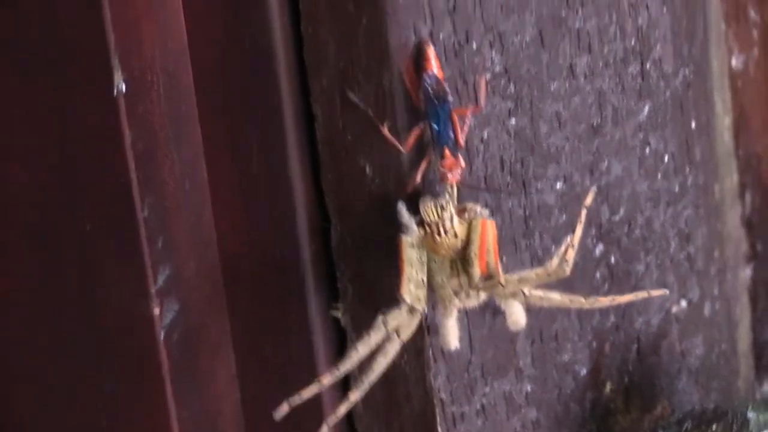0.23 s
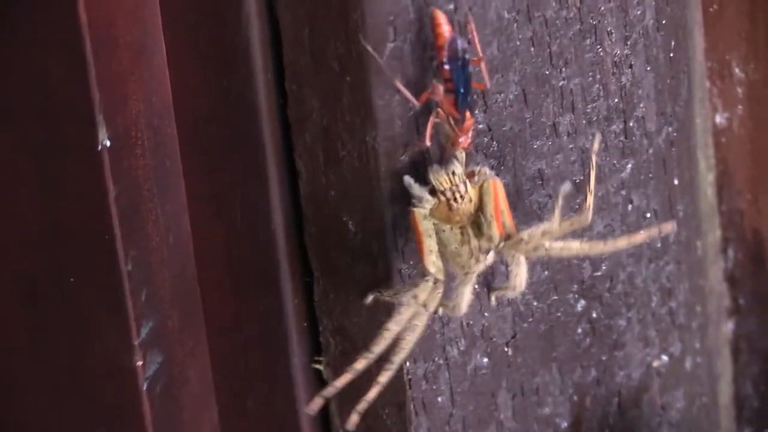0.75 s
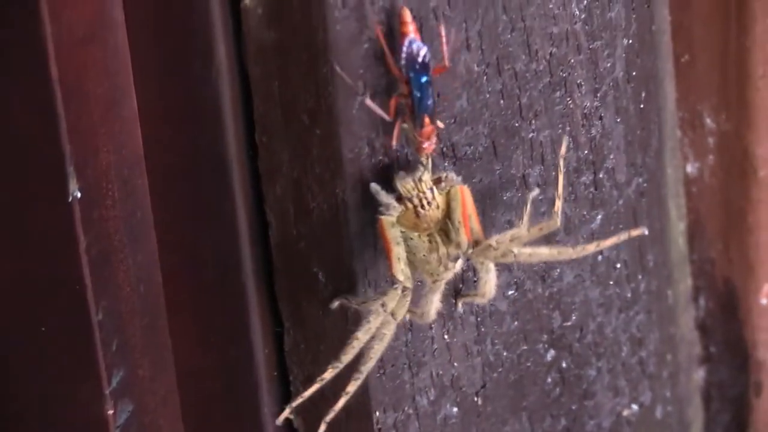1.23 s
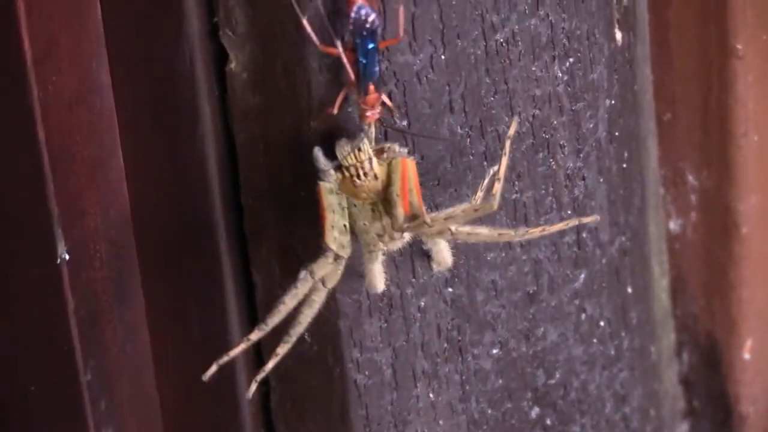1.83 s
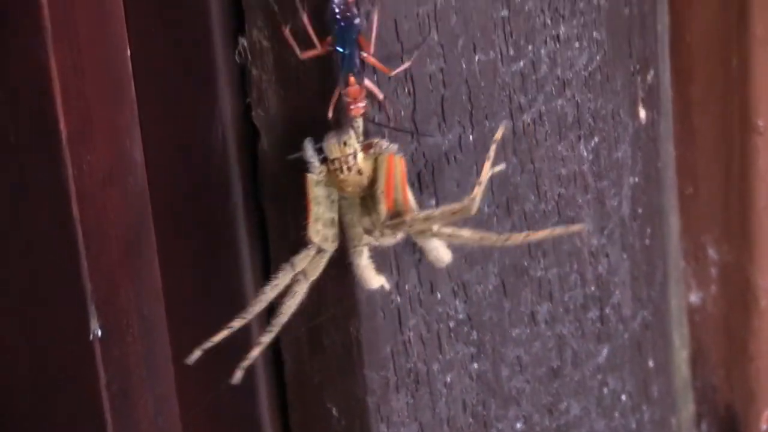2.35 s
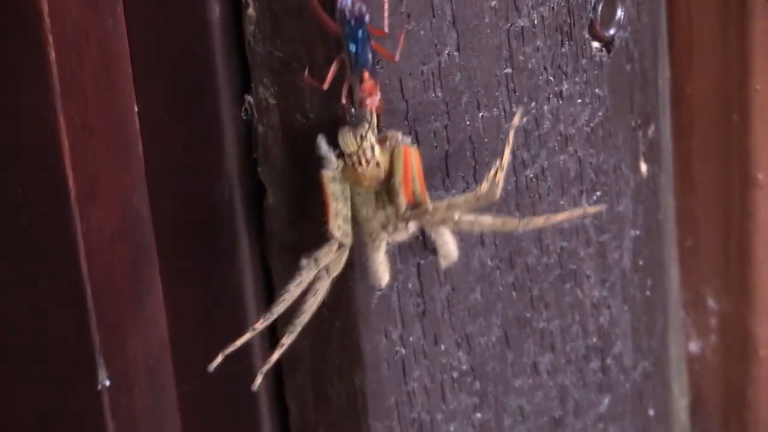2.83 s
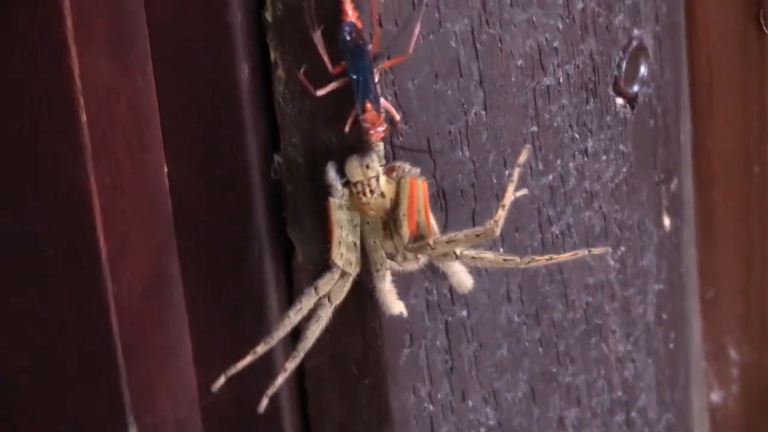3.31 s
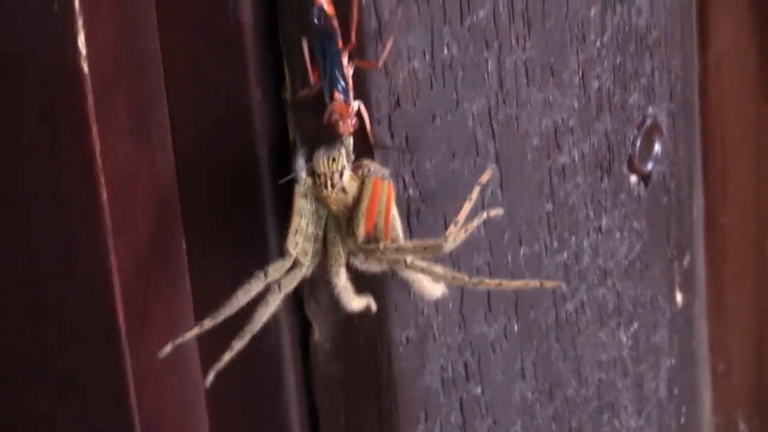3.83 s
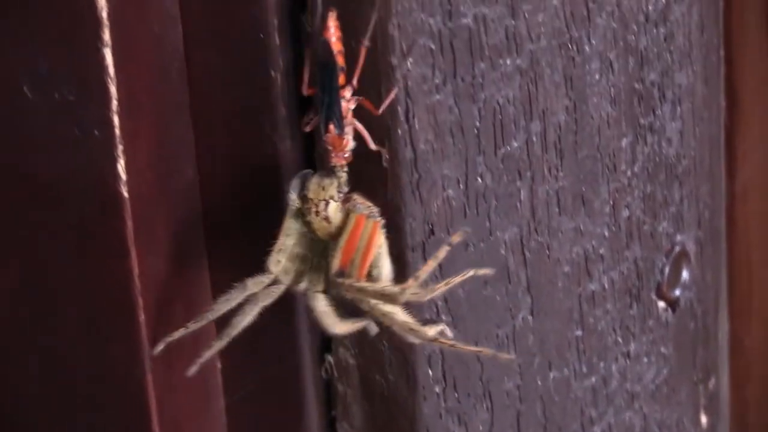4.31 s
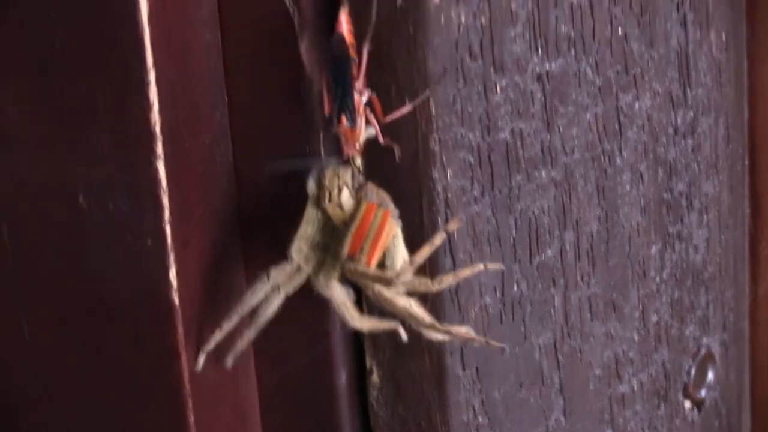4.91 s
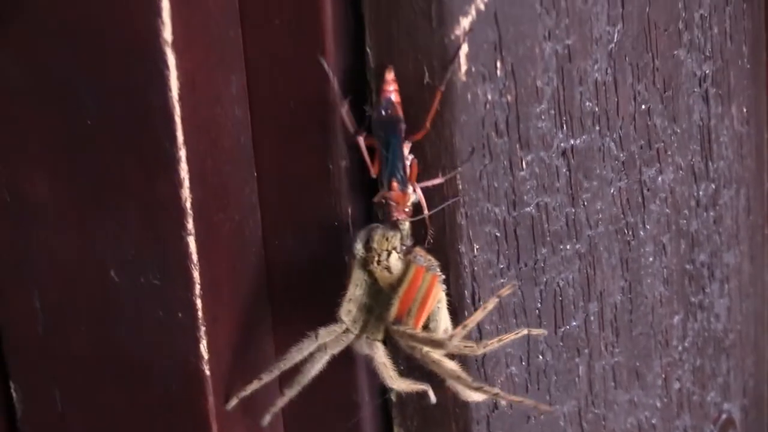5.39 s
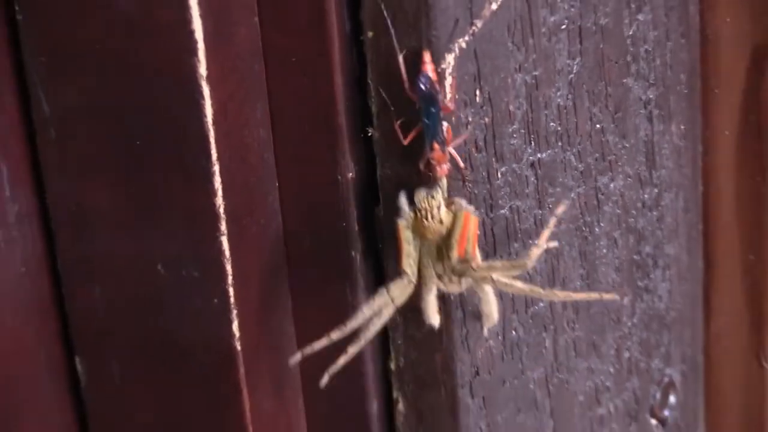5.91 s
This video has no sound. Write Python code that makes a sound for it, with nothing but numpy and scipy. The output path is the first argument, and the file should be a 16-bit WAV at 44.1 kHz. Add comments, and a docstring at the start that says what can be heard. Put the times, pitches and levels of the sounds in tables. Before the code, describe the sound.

A distant engine and a faint electrical hum lie beneath a shrill, steady insect chorus, with crickets slightly to the right. Birds call among echoing trees: grainy rasps, rough falling growls ending in clear chips, thin peeps and far whistles. After a sparser middle, rasps return in quick succession, then one dry tap clicks close by amid yips and chips, and wheezy rasps close the scene.

```python
"""From the outset an insect chorus holds a steady shrill band, filtered noise, while crickets chirp in swelling tones;
soon far insects trill thinly, each on one pitch. A distant engine throbs as harmonics of its firing rate, first
slowing and then picking up, over a faint steady hum. Birds call in a forest: shaped noise gives hissing rasps and
gliding tones give far, nearly level whistles; soon come roughened growls that fall and end in bright chips, then
peeps, squawks, yips and thin wheezes. Late on, one sharp tap sounds close by, as a burst of damped modes."""
import sys
import numpy as np
from scipy import signal
from scipy.io import wavfile
from scipy.ndimage import uniform_filter1d

SR = 44100
rng = np.random.default_rng(int(sys.argv[2]) if len(sys.argv) > 2 else 0)


def store_pcm(level_fs):
    """Save levels as 16-bit WAV."""
    pcm = np.round(np.clip(level_fs, -1, 1) * 32767).astype(np.int16)
    wavfile.write(sys.argv[1], SR, np.atleast_2d(pcm).T)


N = 271435
TIME = np.arange(N) / SR
# Frequencies (Hz) and times (s) of the short-time spectra
BINS = np.fft.rfftfreq(1024, 1 / SR)
FRAMES = np.arange(N // 256 + 5) * 256 / SR


def gain_of(db):
    """Level law: decibels to an amplitude ratio."""
    return 10 ** (np.asarray(db) / 20)


def evened(x):
    """Power normalisation: scales to rms 1."""
    return x / np.sqrt(np.mean(x ** 2) + 1e-20)


def read(points, hz):
    """Spectral envelope: interpolates a table on a log-frequency axis."""
    f, value = np.transpose(points)
    return np.interp(np.log(hz + 1), np.log(f + 1), value)


def follow(rows):
    """Time envelope: interpolates a table at every sample."""
    return np.interp(TIME, *np.transpose(rows))


def add(mix, s, sound):
    """Superposition: mixes a sound in at a time, or at the very start if that time is negative."""
    part = mix[max(round(s * SR), 0):][:len(sound)]
    part += sound[:len(part)]


def wander(rate):
    """Band-limited random modulation: rms 1, fluctuating up to about a rate per second."""
    steps = rng.standard_normal(size=10000)
    return evened(np.interp(np.arange(N) * 2 * rate / SR, np.arange(len(steps)), steps))


# Likeness of the two channels in diffuse noise. Each row: frequency in Hz, left-right correlation.
CHANNEL_LIKENESS = [(30, .6), (70, .99), (170, .99), (330, .5), (700, .2), (2000, .45), (8000, .5),
                    (14000, .7)]


def noise(shape_db, patchy_db):
    """Diffuse field: coloured stereo noise of rms 1, partly correlated, with small drifting patches."""
    a, b, c, d, patches = rng.standard_normal((5, len(FRAMES), len(BINS)))
    patches = uniform_filter1d(uniform_filter1d(patches, size=7, axis=0), size=7, axis=1)
    patches = np.clip(evened(patches), -2, 2)
    same = np.clip(read(CHANNEL_LIKENESS, BINS), -1, 1)
    left = a + 1j * b
    right = same * left + np.sqrt(1 - same ** 2) * (c + 1j * d)
    spectra = np.array([left, right]) * gain_of(shape_db + patchy_db * patches)
    return evened(signal.istft(spectra.transpose(0, 2, 1), nperseg=1024, noverlap=768)[1][:, :N])


# Decay of the forest's echo tail. Each row: frequency in Hz, time to fall 60 dB in seconds.
FOREST_DECAY = [(200, .068), (1300, 1), (5000, 1), (9000, 0.01)]


def forest(x, wet_db, pan_db, near_db):
    """Reverberation: direct sound, early scatter from near trunks and leaves, and a tail from trees behind."""
    hz, t, z = signal.stft(rng.standard_normal((2, SR)), SR, nperseg=256)
    decay = gain_of(-60 * t / read(FOREST_DECAY, hz)[:, None])
    tail = signal.istft(z * decay, SR, nperseg=256)[1][:, :SR]
    early = rng.standard_normal((2, SR)) * np.exp(-TIME[:SR] / 0.022)
    echoes = (gain_of(wet_db) * evened(tail) + gain_of(near_db) * evened(early)) / np.sqrt(SR)
    heard = x + signal.fftconvolve(x[None], echoes, axes=1)[:, :N]
    return heard * gain_of([[pan_db / 2], [-pan_db / 2]])


def bend(length, hz, ratios):
    """Frequency glide: a parabola through pitch ratios at the start, middle and end."""
    curve = np.polyfit([0, .5, 1], ratios, 2)
    return hz * np.polyval(curve, np.linspace(0, 1, round(length * SR)))


def sing(notes, partials, jitter, jitter_rate, flutter, edge):
    """Additive synthesis of (s, pitch curve, dB) notes from (multiple, dB) partials, roughened by FM and AM."""
    out, shake, tremble = np.zeros(N), wander(jitter_rate), wander(jitter_rate)
    for s, pitch, db in notes:
        at = (round(s * SR) + np.arange(len(pitch))) % N
        phase = 2 * np.pi * np.cumsum(pitch * (1 + jitter * shake[at])) / SR
        tone = sum(gain_of(d) * np.sin(k * phase) for k, d in partials)
        tone = evened(tone * (1 + flutter * tremble[at]))
        fades = signal.windows.tukey(len(pitch), np.clip(edge, .05, 1))
        add(out, s, gain_of(db) * tone * fades)
    return out


# Colour of the forest air. Each row: frequency in Hz, relative density in dB per Hz.
AIR_COLOUR = [(50, -52), (85, -24), (130, 11.5), (200, 7.5), (330, -1), (500, 1), (1200, -3), (2000, -7.5),
              (3300, -9.5), (5600, -42), (9000, -18.5), (11500, -27), (15500, -36)]


def air(level_db=-55):
    """Broadband noise: the soft wash of the forest and far low rumble."""
    return noise(read(AIR_COLOUR, BINS), patchy_db=1.5) * gain_of(level_db + .5 * wander(4.0))


# Engine speed, sagging and then picking up. Each row: time in seconds, firings per second.
ENGINE_FIRINGS = [(0, 33.4), (.35, 32.1), (.65, 31.6), (1, 30.4), (1.45, 29.8), (1.8, 29.1), (2.5, 28.2),
                  (3, 28.25), (4.1, 28.8), (4.75, 29.45), (5.3, 30.3), (6.15, 31.35)]
# Gain of the engine's throb. Each row: time in seconds, gain in dB.
ENGINE_GAIN = [(0, -4), (.6, 0.5), (1.5, -5), (2.2, -9), (3.1, -1.5), (3.6, -6.5), (4, -2), (5.3, 1.5),
               (6.15, 1.5)]
# The engine coasts, then pulls again. Each row: time in seconds, load from 0 to 1.
ENGINE_LOAD = [(0, 0.57), (.35, 0.11), (1.4, 0.18), (2.05, 0.35), (2.4, 1), (6.15, 0.85)]
# Exhaust resonances while coasting. Each row: frequency in Hz, level in dB before the engine's gain.
COASTING_PIPE = [(60, -83), (93, -65), (122, -53), (155, -53.5), (185, -60.5), (230, -69), (290, -87),
                 (400, -82)]
# Exhaust resonances while pulling. Each row: frequency in Hz, level in dB before the engine's gain.
PULLING_PIPE = [(58, -81), (118, -86), (143, -60.5), (153, -49.5), (172, -49.5), (187, -49.5), (205, -50),
                (217, -56.5), (228, -87), (243, -92), (254, -73), (272, -63), (303, -56.5), (316, -72.5),
                (400, -75)]
# Colour of the low rumble around the engine. Each row: frequency in Hz, relative density in dB per Hz.
RUMBLE_COLOUR = [(50, -72), (100, -15), (160, 6), (215, 6.5), (260, 3), (420, -8)]
# Loudness of that rumble. Each row: time in seconds, level in dB.
RUMBLE_LEVEL = [(0, -53), (.35, -57), (1, -63), (4.95, -56), (5.2, -47.5), (5.45, -54), (6.15, -51)]
COAST_LIMP = .35  # strong-weak contrast of alternate firings at no load


def engine(ring_hz=175, ring_width_hz=80, uneven=0.075):
    """Source and filter: firing-rate harmonics slide through exhaust resonances, limping less under load."""
    rate, load = follow(ENGINE_FIRINGS), np.clip(follow(ENGINE_LOAD), 0, 1)
    firings = np.cumsum(rate) / SR + .012 * (1 - load) * wander(14)
    body = np.zeros(N)
    for order in range(2, 14):
        hz = order * rate
        db = (1 - load) * read(COASTING_PIPE, hz) + load * read(PULLING_PIPE, hz)
        # phase lag of a resonator, passing zero at its own frequency
        lag = np.arctan((hz / ring_hz - ring_hz / hz) * ring_hz / ring_width_hz)
        level = np.sqrt(2) * gain_of(db + .8 * wander(2))
        body += level * np.cos(2 * np.pi * order * firings - lag)
    sizes = 1 + uneven * wander(15) + COAST_LIMP * (1 - load) * np.cos(np.pi * firings)
    throb = body * sizes * gain_of(follow(ENGINE_GAIN))
    above_rumble = BINS > RUMBLE_COLOUR[-1][0]
    rumble = noise(read(RUMBLE_COLOUR, BINS) - 200 * above_rumble, patchy_db=1)
    return throb + rumble * gain_of(follow(RUMBLE_LEVEL))


# A steady electrical hum. Each row: frequency in Hz, level in dB.
HUM_TONES = [(120, -66.5), (240, -65.5)]


def hum():
    """Stationary sinusoids: two faint steady tones under the engine."""
    return sum(np.sqrt(2) * gain_of(db) * np.sin(2 * np.pi * hz * TIME) for hz, db in HUM_TONES)


# Colour of the insect chorus. Each row: frequency in Hz, relative density in dB per Hz.
CHORUS_COLOUR = [(6500, -21), (6820, -16.5), (7000, -5), (7140, 0.5), (7330, 3.5), (7530, -9.5),
                 (7610, -0.5), (7730, -25), (7830, -2.5), (7930, -4), (8250, -8.5), (8500, -23.5),
                 (9200, -34.5)]


def chorus(level_db=-52.0):
    """Narrow-band noise: many insects fuse into one shrill band that flickers faintly in level."""
    return noise(read(CHORUS_COLOUR, BINS), patchy_db=1.0) * gain_of(level_db + 0.17 * wander(35))


CHIRP_SLIP_S = .003  # rms timing error of a chirp


def beats(start, end, period):
    """Jittered periodicity: evenly spaced chirp times, each slipping a little."""
    times = np.arange(start, end, period)
    return times + CHIRP_SLIP_S * rng.standard_normal(len(times))


def cricket(times, levels, hz, stroke_s, fall_hz, spread_hz):
    """Amplitude modulation: three wing strokes swell one high tone, which sags a little in pitch."""
    out, strokes = np.zeros(N), np.arange(0, 3, 1 / (stroke_s * SR))
    for s, db, (detune, *sizes) in zip(times, levels, rng.standard_normal((len(times), 4))):
        pitch = hz + spread_hz * detune + fall_hz * (.5 - strokes / strokes[-1])
        stroke_db = 0.84 * np.take(sizes, strokes.astype(int), mode="clip")
        swell = abs(np.sin(np.pi * strokes)) * gain_of(db + stroke_db)
        add(out, s - len(strokes) / SR / 2, swell * np.sin(2 * np.pi * np.cumsum(pitch) / SR))
    return out


# Runs of chirps of the near cricket. Each row: first chirp in seconds, end in seconds, period in seconds.
NEAR_CRICKET_RUNS = [(.415, .7, .116), (1.157, 4.58, .1053), (4.74, 6.2, .1083)]
# The second cricket chirps steadily, fades and stops
SECOND_PERIOD_S, SECOND_STOP_S = .098, 2.9
SECOND_DB, SECOND_FADE_DB_PER_S = -47, 3.5


def crickets(near_db=-47.0):
    """Interaural cues: two crickets sound to the right, as the left channel is weaker and a sample later."""
    times = beats(.015, SECOND_STOP_S, SECOND_PERIOD_S)
    levels = SECOND_DB - SECOND_FADE_DB_PER_S * times
    second = cricket(times, levels, hz=8225, stroke_s=.015, fall_hz=90, spread_hz=25)
    times = np.concatenate([beats(*run) for run in NEAR_CRICKET_RUNS])
    levels = np.full(len(times), near_db)
    near = cricket(times, levels, hz=8068, stroke_s=.0152, fall_hz=15, spread_hz=10)
    left, right = forest(near + second, wet_db=-9, pan_db=-1, near_db=-20)
    return np.array([np.roll(left, 1), right])


# Harsh rasps. Each row: start in seconds, length in seconds, hiss level in dB, centre of the hiss in Hz,
# throat level in dB.
RASP_CALLS = [(-.04, 0.29, -51, 4510, -58.5), (0.235, 0.25, -54, 4400, -55.5),
              (1.496, .11, -52, 3740, -55.5), (1.578, 0.43, -46.5, 4150, -62),
              (2.139, 0.28, -53.5, 4260, -54.5), (2.754, 0.37, -64, 3870, -83),
              (3.49, 0.1, -56.5, 3900, -67), (3.567, 0.3, -49.5, 4740, -55),
              (3.803, 0.26, -52.5, 4500, -53.5), (4.027, 0.18, -51.5, 4320, -57),
              (4.575, 0.43, -49, 4190, -57.5), (4.975, 0.27, -53.5, 4180, -59.5),
              (5.47, 0.27, -53, 3500, -55.5), (5.68, 0.24, -54, 3740, -48.5)]
# Colour of the hiss at its usual pitch. Each row: frequency in Hz, relative density in dB per Hz.
HISS_COLOUR = [(500, -33), (2000, -8), (3300, -2), (3800, 2), (4700, 2), (5300, -3), (6000, -13.5),
               (7000, -13.5), (11000, -30.5), (15000, -43)]
# Fixed resonances of the throat. Each row: frequency in Hz, relative density in dB per Hz.
THROAT_COLOUR = [(250, -12.5), (520, 1), (800, -10.5), (1030, 2.5), (1300, -12.5), (1680, 4.5), (2200, -29),
                 (2850, -1.5), (3200, -7.5), (4000, -47)]
RASP_SCOOP, RASP_OPEN_S = 0.047, 0.017  # each rasp starts this share lower and opens upward
STRAND_HZ, STRAND_DRIFT, STRAND_DB = 440, .018, 2.2  # spacing at the usual pitch, its drift, ripple depth


def rasps(grain_db=-1.0, usual_hz=4300, attack_s=0.013, release_s=0.095, arch_db=3.5, echo_db=-11, echo_s=0.5):
    """Turbulence noise: a grainy hiss whose bright band shifts by call, over fixed throat resonances."""
    s, length, db, hz, low_db = np.transpose(RASP_CALLS)[:, :, None]
    age, left = FRAMES - s, s + length - FRAMES
    arch = gain_of(-arch_db * np.clip(2 * age / length - 1, -1, 1) ** 2)  # swells to the middle
    echo = gain_of(echo_db) * np.exp(np.minimum(left, 0) / echo_s)  # lingers among the trees
    release = np.clip(left / release_s + .5, 0, 1)
    shape = np.clip(age / attack_s, 0, 1) * np.maximum(arch * release, echo)
    hiss_power = (shape * gain_of(db)) ** 2 + 1e-16
    throat_power = (shape * gain_of(low_db)) ** 2
    hiss_level = np.interp(TIME, FRAMES, np.sqrt(hiss_power.sum(axis=0)))
    throat_level = np.interp(TIME, FRAMES, np.sqrt(throat_power.sum(axis=0)))
    pitch = hz * (1 - RASP_SCOOP * np.exp(-np.maximum(age, 0) / RASP_OPEN_S))
    # overlapping calls share one band, placed by their power
    stretch = np.average(pitch, weights=hiss_power, axis=0) / usual_hz
    spacing = STRAND_HZ * stretch * (1 + STRAND_DRIFT * np.interp(FRAMES, TIME, wander(8)))
    strands = STRAND_DB * np.cos(2 * np.pi * BINS / spacing[:, None])  # smeared overtones that waver
    hiss = noise(read(HISS_COLOUR, BINS / stretch[:, None]) + strands, patchy_db=2.5) * hiss_level
    throat = noise(read(THROAT_COLOUR, BINS), patchy_db=-2.5) * throat_level
    return (hiss + throat) * gain_of(grain_db * wander(130)) * gain_of([[-.3], [.3]])


# Whistles of two birds, often overlapping. Each row: start in seconds, length in seconds, pitch in Hz,
# rise over the note in Hz, final drop in Hz, level in dB before the cut for distance, swell over the note in dB.
WHISTLE_NOTES = [(0, 0.088, 1314, -9, -4, -44, -20), (0.151, 0.52, 1336, 4, 113, -41.5, -4.5),
                 (0.226, 0.57, 1376, -3, 2, -49, -3), (1.38, 0.44, 1308, 36, -6, -48, 14),
                 (1.885, 0.58, 1307, -15, 106, -43.5, -3), (1.95, 0.44, 1358, 7, 3, -43.5, 8),
                 (4.577, 0.067, 1640, 8, 16, -45, -1), (4.846, 0.073, 1676, -2, -2, -43.5, -2)]
WHISTLE_DROP_S = 0.0306  # time constant of the final drop


def whistle(s, length, hz, rise_hz, drop_hz, db, swell_db):
    """Frequency glide: a nearly level pitch drops at the very end while the level slopes in dB."""
    t = np.arange(0, length, 1 / SR)
    along = t / length - .5
    pitch = hz + rise_hz * along - drop_hz * np.exp((t - length) / WHISTLE_DROP_S)
    return s, pitch, db + swell_db * along


def whistles():
    """Pure-tone phonation: single sinusoids with slight pitch jitter and a flutter in level."""
    notes = [whistle(*row) for row in WHISTLE_NOTES]
    return sing(notes, [(1, 0)], jitter=.011, jitter_rate=50, flutter=.35, edge=.25)


# Partials of throaty notes, with subharmonics below and between: (multiple of the pitch, dB)
THROATY = [(1 / 2, -12), (1, 0), (3 / 2, -16), (2, -18)]
# Harsh rising croaks, mostly leading into growls. Each row: start in seconds, level in dB.
CROAK_NOTES = [(.255, -55.5), (.625, -47.5), (1.06, -49), (3.896, -55), (4.132, -48), (4.293, -50.5),
               (5.955, -57)]
# Pitch of croaks and yips at the start, middle and end, as ratios.
RISING_BEND = (.88, 1, 1.06)
CROAK_HZ, CROAK_S = 2058, 0.0312


def croaks():
    """Aperiodic phonation: strong fast jitter blurs a rising tone with subharmonics into harshness."""
    notes = [(s, bend(CROAK_S, CROAK_HZ, RISING_BEND), db) for s, db in CROAK_NOTES]
    return sing(notes, THROATY, jitter=.13, jitter_rate=500, flutter=.6, edge=.3)


GROWL_RATTLE_HZ, GROWL_RATTLE = 78, .5  # mean pulse rate, depth


def rattle(hz, depth):
    """Amplitude modulation: the uneven pulsing of a growling throat."""
    turns = np.cumsum(hz * (1 + .25 * wander(40))) / SR
    return evened(1 + depth * np.cos(2 * np.pi * turns))


def rattling(notes):
    """Period doubling: jittered tones with subharmonics, pulsed by the rattle."""
    tones = sing(notes, THROATY, jitter=.042, jitter_rate=380, flutter=.5, edge=.2)
    return tones * rattle(GROWL_RATTLE_HZ, GROWL_RATTLE)


# Falling growls. Each row: start in seconds, length in seconds, pitch in Hz, level in dB.
GROWL_NOTES = [(0.285, 0.12, 1802, -54), (0.655, .13, 1812, -49), (1.083, 0.14, 1843, -47.5),
               (1.554, 0.092, 1785, -49), (4.166, .066, 1741, -49.5), (4.691, 0.082, 1790, -51.5)]
# Pitch of a growl at the start, middle and end, as ratios.
GROWL_GLIDE = (1.17, 1, .85)


def growls():
    """Falling glide: rattling notes sink in pitch toward the chips."""
    return rattling([(s, bend(length, hz, GROWL_GLIDE), db) for s, length, hz, db in GROWL_NOTES])


def bright(notes):
    """Spectral spread: clear tones with an octave partial, plus a fainter heavily jittered buzz."""
    partials = [(1, 0), (2, -17)]
    clear = sing(notes, partials, jitter=.013, jitter_rate=220, flutter=.18, edge=.32)
    buzz = sing(notes, partials, jitter=.13, jitter_rate=600, flutter=.6, edge=.2)
    return clear + gain_of(-14) * buzz


# Scooped chips that mostly follow the growls. Each row: start in seconds, length in seconds, pitch in Hz,
# depth of the scoop as a share of the pitch, level in dB.
CHIP_NOTES = [(.387, 0.034, 2302, 0.015, -41.5), (0.772, 0.042, 2308, 0.019, -41.5),
              (1.212, 0.038, 2282, .045, -40.5), (1.67, 0.03, 2210, 0.035, -40.5),
              (4.257, .055, 2184, 0.178, -44), (4.382, 0.024, 2174, 0.043, -45),
              (4.798, 0.048, 2227, 0.031, -45.5)]
# Pitch of a chip at the start, middle and end before its scoop, as ratios.
CHIP_GLIDE = (0.99, 0.97, 1.067)


def chips():
    """Scooped glide: each bright note is raised at both ends by the depth of its scoop."""
    notes = []
    for s, length, hz, scoop, db in CHIP_NOTES:
        notes.append((s, bend(length, hz, np.add(CHIP_GLIDE, (scoop, 0, scoop))), db))
    return bright(notes)


# Higher second voice over each closing note. Each row: start in seconds, length in seconds, pitch in Hz,
# level in dB.
UPPER_NOTES = [(.419, 0.048, 2950, -57.5), (.807, 0.034, 3045, -55), (1.244, 0.06, 2870, -52.5)]
# Pitch of second voices and squawks at the start, middle and end, as ratios.
UPPER_GLIDE = (1.02, .99, .99)


def upper_voices():
    """Biphonation: an independent higher tone sounds along with the closing note."""
    notes = [(s, bend(length, hz, UPPER_GLIDE), db) for s, length, hz, db in UPPER_NOTES]
    return sing(notes, [(1, 0), (2, -12)], jitter=.014, jitter_rate=300, flutter=.45, edge=.2)


# Lower voice of the two-voiced closing notes. Each row: start in seconds, pitch in Hz, level in dB.
CLOSING_NOTES = [(.421, 2350, -46.5), (.81, 2163, -39.5), (1.248, 2140, -38.5)]
# Pitch of a closing note at the start, middle and end, as ratios.
CLOSING_GLIDE = (1.01, 1, 1.02)
CLOSE_S = 0.0226


def closing_notes():
    """Nearly level glide: short bright, buzzy notes end the phrase."""
    return bright([(s, bend(CLOSE_S, hz, CLOSING_GLIDE), db) for s, hz, db in CLOSING_NOTES])


# Far insects trill on one pitch. Each row: start in seconds, length in seconds, pitch in Hz, level in dB.
TRILL_NOTES = [(.6, 2.5, 7619, -66.5), (4.1, 1, 7825, -63), (5.3, .84, 7622, -64)]


def trills():
    """Random amplitude modulation: thin wavering tones from far insects within the chorus."""
    notes = [(s, np.full(round(length * SR), hz), db) for s, length, hz, db in TRILL_NOTES]
    tones = sing(notes, [(1, 0)], jitter=.001, jitter_rate=30, flutter=.6, edge=.4)
    return forest(tones, wet_db=-5, pan_db=0, near_db=-15)


# Thin falling peeps. Each row: start in seconds, length in seconds, pitch in Hz, level in dB.
PEEP_NOTES = [(1.034, 0.038, 3400, -56), (3.94, 0.072, 2860, -48.5), (6, 0.059, 2614, -50)]
# Pitch of a peep at the start, middle and end, as ratios.
PEEP_GLIDE = (1.04, .99, .99)


def peeps():
    """Pure-tone glide: single sinusoids fall slightly in pitch."""
    notes = [(s, bend(length, hz, PEEP_GLIDE), db) for s, length, hz, db in PEEP_NOTES]
    return sing(notes, [(1, 0)], jitter=.011, jitter_rate=250, flutter=.2, edge=.5)


# Hoarse squawks near the start of rasps, one or two voices at once. Each row: start in seconds,
# length in seconds, pitch in Hz, level in dB.
SQUAWK_NOTES = [(1.518, 0.11, 1895, -51.5), (3.499, .115, 1880, -55.5), (3.503, 0.117, 2280, -55.5)]
# Partials of a squawk. Each row: multiple of the pitch, relative level in dB.
SQUAWK_OVERTONES = [(1, -2), (2, 5)]


def squawks():
    """Dominant overtone: the octave outweighs the fundamental, and fast jitter makes it hoarse."""
    notes = [(s, bend(length, hz, UPPER_GLIDE), db) for s, length, hz, db in SQUAWK_NOTES]
    return sing(notes, SQUAWK_OVERTONES, jitter=.045, jitter_rate=600, flutter=.6, edge=.2)


# Short rising yips, all of one length. Each row: start in seconds, pitch in Hz, level in dB.
YIP_NOTES = [(1.76, 1900, -50.5), (4.238, 1800, -53), (4.345, 1570, -55), (4.625, 1890, -51),
             (4.95, 1946, -49)]
YIP_S = 0.0295


def yips():
    """Rising glide: short rattling notes within and between phrases."""
    return rattling([(s, bend(YIP_S, hz, RISING_BEND), db) for s, hz, db in YIP_NOTES])


# Thin wheezes inside the lower rasps. Each row: start in seconds, length in seconds, level in dB.
WHEEZE_NOTES = [(2.8, .38, -66.5), (5.483, .16, -58.5), (5.69, .15, -55)]
# A wheeze and its faint higher partial. Each row: multiple of the pitch, relative level in dB.
WHEEZE_OVERTONES = [(1, 0), (1.26, -7)]
WHEEZE_HZ = 3770


def wheezes():
    """Inharmonic partials: two level tones, unsteadied by fast jitter and flutter."""
    notes = [(s, np.full(round(length * SR), WHEEZE_HZ), db) for s, length, db in WHEEZE_NOTES]
    return sing(notes, WHEEZE_OVERTONES, jitter=.018, jitter_rate=400, flutter=.6, edge=.15)


def birds(far_db=-10):
    """Distance cues: echo shares place the voices in the forest, and the whistlers are also cut in level."""
    far = forest(whistles(), wet_db=-6, pan_db=-.6, near_db=-12)
    among = forest(croaks() + growls() + upper_voices() + yips(), wet_db=-3.2, pan_db=-1.4, near_db=-11)
    near = chips() + closing_notes() + peeps() + squawks() + wheezes()
    near = forest(near, wet_db=-5.5, pan_db=-1.4, near_db=-13)
    return near + among + gain_of(far_db) * far


# Two knocks so close that they fuse into one tap. Each row: start in seconds, peak level in dB.
TAP_KNOCKS = [(4.4876, -21), (4.4897, -33)]
# What the tap rings with. Each row: frequency in Hz, relative level in dB, time to fall 60 dB in seconds.
TAP_RESONANCES = [(780, -4, 0.0071), (1290, 9, 0.012), (2100, 19, 0.0071), (2370, 49, 0.0014),
                  (3480, 6.5, 0.029), (7500, -13, .003), (11000, -7, .003)]


def tap(rise_s=0.0009):
    """Modal synthesis: a small hard knock close by excites damped modes that die within milliseconds."""
    t, out, ring = TIME[:2000], np.zeros(N), 0
    for hz, db, t60 in TAP_RESONANCES:
        ring = ring + gain_of(db - 60 * t / t60) * np.sin(2 * np.pi * hz * (t - rise_s))
    ring = ring * np.minimum(t / rise_s, 1) ** 2
    for s, db in TAP_KNOCKS:
        add(out, s, gain_of(db) * ring / abs(ring).max())
    return forest(out, wet_db=-15, pan_db=-2.5, near_db=-8)


def scene():
    """Superposition: all sources add at the listener."""
    insects = chorus() + crickets() + trills()
    return air() + engine() + hum() + insects + rasps() + birds() + tap()


EDGE_HZ = 15450


def record(dry):
    """Band limiting: a linear-phase low-pass filter removes what lies above the edge."""
    low_pass = signal.firwin(511, EDGE_HZ, window=("kaiser", 9), fs=SR)
    return signal.oaconvolve(dry, low_pass[None], "same")


dry = scene()
out = record(dry)
store_pcm(out)
```